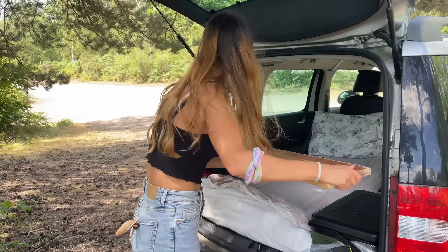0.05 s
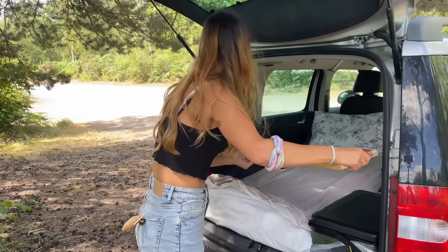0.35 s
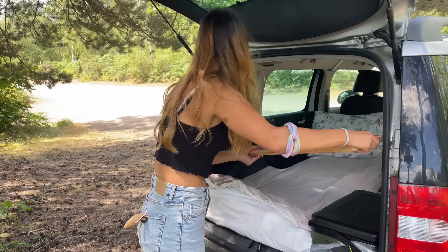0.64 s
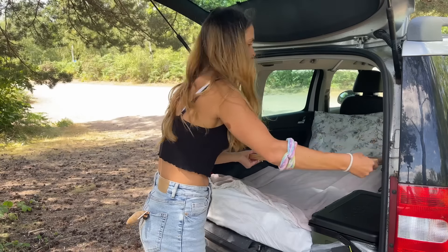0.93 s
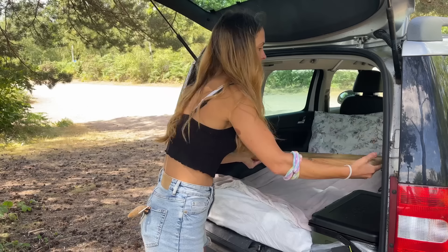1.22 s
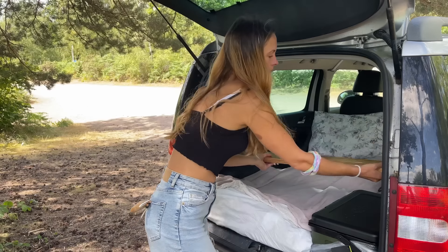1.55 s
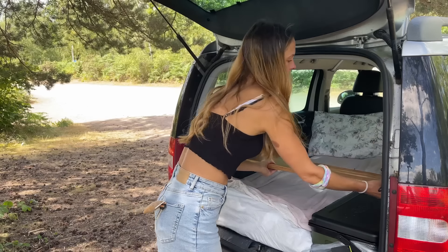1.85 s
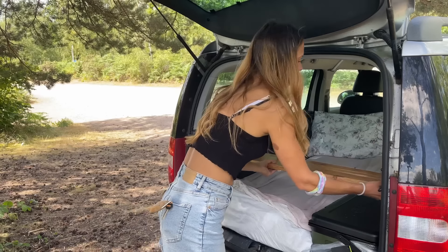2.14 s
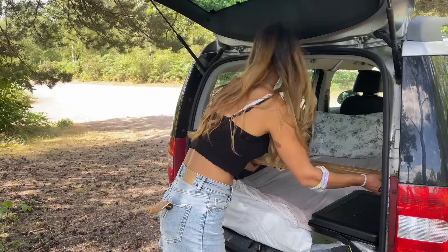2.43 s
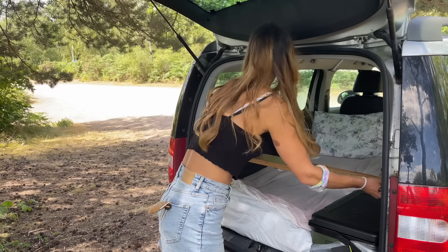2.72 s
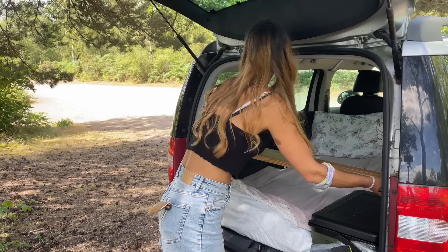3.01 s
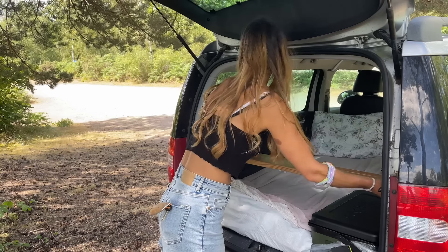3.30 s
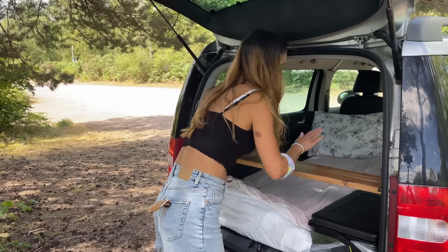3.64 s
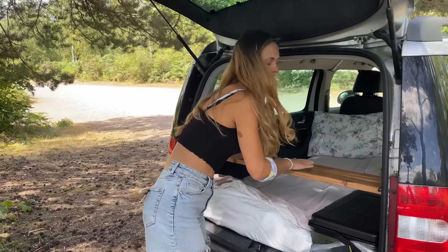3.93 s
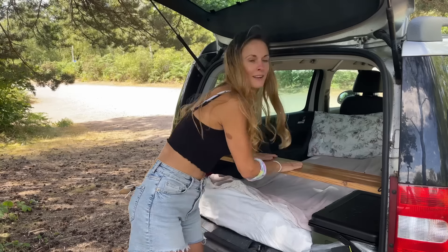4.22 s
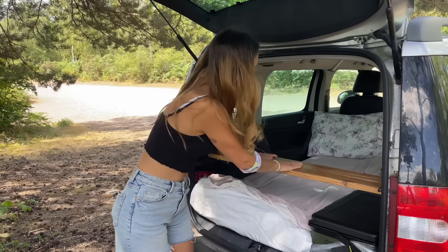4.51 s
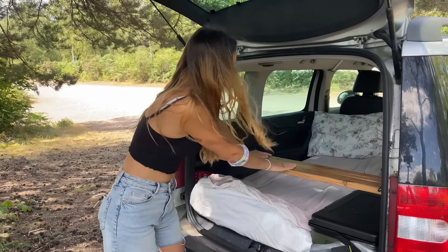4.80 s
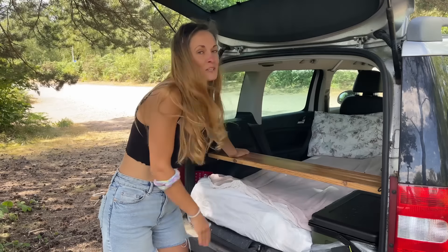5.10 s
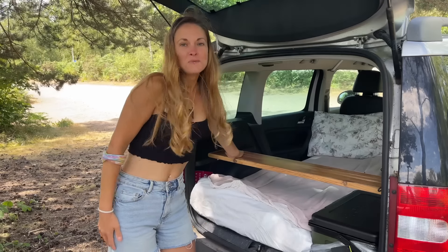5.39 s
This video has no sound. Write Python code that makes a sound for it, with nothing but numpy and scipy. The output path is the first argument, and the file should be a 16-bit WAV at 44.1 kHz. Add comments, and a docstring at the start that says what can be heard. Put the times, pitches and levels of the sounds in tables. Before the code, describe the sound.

Outdoors in a light breeze, wood bumps and rubs on car trim until a palm slap sends it juddering down with a hollow clatter.

```python
"""A wooden plank is shuffled into place across an open car boot: it knocks on plastic trim and door pillar,
and scrapes and squeals by stick-slip. Two palm slaps drive it home; it judders down the trim, panels boom.
Loose metal jingles, hands and clothes brush and tick.
Wind buffets the microphone over a quiet outdoor hush."""
import sys
import numpy as np
from scipy import signal
from scipy.fft import rfft, irfft
from scipy.io import wavfile

SR = 44100
rng = np.random.default_rng(int(sys.argv[2]) if len(sys.argv) > 2 else 0)


def file_out(sig):
    """Save sig as 16-bit WAV at sys.argv[1]."""
    # one column per channel
    cols = np.atleast_2d(sig).T
    # limit, then scale
    lim = np.clip(cols, -1, 1)
    pcm = np.round(lim * 32767).astype(np.int16)
    wavfile.write(sys.argv[1], SR, pcm)


N = 244887
T = np.arange(N) / SR
RING_T = T[:SR // 4]

# wind on the microphone: t/s, relative level/dB
GUSTS = [(0.0, -57.5), (1.92, -54.5), (2.09, -51.5), (2.12, -58.5), (3.32, -53), (3.34, -54.5),
         (4.2, -49.5), (4.28, -41), (4.37, -57.5), (4.74, -60.5), (4.79, -53.5), (5.55, -48)]
# spectra: f/Hz, relative level/dB
WIND_SPECTRUM = [(20, -28), (32, -11.5), (50, 0.5), (80, 0), (120, -6), (180, -13.5), (300, -22),
                 (800, -71)]
HUSH_SPECTRUM = [(60, -3), (160, -3.5), (300, 4.5), (600, 2), (950, -4.5), (1760, -10.5), (2500, -14.5),
                 (5000, -18), (9000, -16.5), (12000, -50), (13300, -72), (16000, -45)]
BRUSH_SPECTRUM = [(200, -45), (500, -0.5), (1300, 2), (3000, -0.5), (6400, -4), (8700, 2), (11400, 8.5),
                  (12600, -7.5), (13600, -44), (15500, -58)]
SNAP_SPECTRUM = [(30, -54), (300, 15), (900, 16), (2000, 9), (4000, 2), (6500, -7), (9000, -6.5),
                 (11500, 0.5), (13000, -21), (15500, -32)]
TRIM_SPECTRUM = [(60, -13), (300, 4.5), (700, 7.5), (1000, 2), (1500, 2), (2000, 0.5), (3000, -8.5),
                 (4200, -17.5), (6000, -24), (12000, -43)]
# modes: f/Hz, relative level/dB, t60/s
PLANK_MODES = [(185, -0.5, 0.18), (220, 7, 0.17), (250, 2.5, 0.14), (313.7, 1.5, 0.2), (380.2, 3.5, 0.14),
               (450.3, 4.5, 0.13), (580, -14, 0.16), (631.5, -4, 0.12), (770, -7.5, 0.15), (827, -4.5, 0.1),
               (920, -6, 0.11), (1082, -13.5, 0.14), (1193, -6.5, 0.068), (1634, -1, 0.07),
               (1894, -11, 0.075), (2647, -19, 0.053)]
PANEL_MODES = [(127.8, -3, 0.22), (156.6, 2.5, 0.15), (181.3, 2.5, 0.17), (201.2, 0, 0.12),
               (297, -10.5, 0.17), (453, -6.5, 0.11), (582.6, -15.5, 0.21), (644, -19, 0.2)]
METAL_MODES = [(4730, 1, 0.035), (4970, -1, 0.03), (5240, 0, .025)]
PILLAR_MODES = [(864, -0.5, 0.27), (902, 3, 0.11), (1073, -2, 0.15), (1820, -4, 0.088), (2723, -7, 0.061),
                (3140, -13.5, 0.041)]
CORNER_MODES = [(1055, 3, 0.018), (1480, -5, 0.015), (1770, -8, 0.0093), (2410, -5, 0.0089)]
# hand and cloth strokes: middle/s, length/s, level/dB, tilt/(dB/octave)
STROKES = [(0.738, 0.19, -65, -2.5), (1.401, 0.28, -65.5, -2.5), (1.528, 0.13, -56.5, 2),
           (1.681, 0.072, -53.5, -1.5), (1.985, 0.3, -65.5, 6), (2.146, 0.13, -65, 5),
           (2.229, 0.042, -57, 3), (2.377, 0.16, -62.5, 6), (2.535, 0.4, -67, 0.5), (2.95, 0.15, -58.5, -2),
           (3.756, 0.07, -64.5, 2), (4.324, 0.071, -51, -2), (4.418, 0.17, -60, 0.5),
           (4.891, 0.25, -53.5, 2.5), (5.227, 0.22, -61.5, -2)]
# bracelet and plank edge: t/s, level/dB, tilt/(dB/octave)
TICKS = [(0.332, -45.5, 4.5), (1.5187, -45.5, 7.5), (1.6543, -50, 10), (1.923, -51.5, 12), (2.144, -45, 17),
         (2.7318, -43, 2), (3.7314, -50.5, 9), (3.789, -48.5, 7.5), (4.428, -51.5, 4)]
# plank on trim, relative levels: t/s, plank/dB, contact resonance/Hz, trim/dB, panels/dB
KNOCKS = [(0.4934, -38.5, 1650, -45, -41), (0.4937, -28.5, 530, -49, -41.5), (.523, -36.5, 430, -47, -55),
          (.698, -39, 1500, -45.5, -36.5), (0.782, -45, 2300, -47.5, -43), (0.855, -34, 1900, -41.5, -32),
          (.860, -30, 257, -66, -38.5), (.895, -42.5, 595, -43, -35.5), (.934, -39, 326, -63, -41),
          (1.645, -49.5, 330, -60, -52), (1.841, -40.5, 620, -59, -58), (2.2408, -36, 2709, -29, -49),
          (2.2417, -27.5, 563, -41, -34), (2.278, -32, 395, -38, -35), (2.319, -49, 1490, -48, -37),
          (2.736, -40, 395, -51, -49), (2.957, -48.5, 2250, -46, -64), (3.232, -37, 1890, -33, -48),
          (3.235, -26, 252, -55, -38.5), (3.258, -32.5, 266, -41, -34), (3.8707, -33, 730, -30, -56),
          (3.871, -24, 260, -59, -35), (3.9056, -29, 2000, -24.5, -24), (3.9206, -24.5, 1490, -20.5, -22),
          (3.9458, -26.5, 2150, -23.5, -26), (3.953, -28.5, 1700, -21.5, -21),
          (4.019, -47.5, 200, -64, -37.5), (4.216, -33, 900, -32.5, -25), (4.246, -33.5, 1610, -35, -27.5),
          (5.401, -39, 289, -66, -39)]
# edge catching on trim: t/s, length/s, level/dB, f/Hz
SQUEALS = [(0.495, 0.006, -52, 1645), (0.694, 0.0069, -50.5, 1626), (0.733, 0.039, -54, 1623),
           (.781, 0.026, -54, 1620), (.782, 0.012, -54.5, 1885), (0.856, 0.016, -44.5, 1625),
           (0.888, 0.018, -51.5, 1614)]
# plank pushed along trim: middle/s, length/s, level/dB
PUSHES = [(0.751, 0.072, -46), (0.918, 0.11, -51.5), (1.056, 0.13, -53), (1.257, 1, -58),
          (1.893, 0.3, -56.5), (2.382, 0.44, -64.5), (2.739, 0.053, -51), (2.964, 0.59, -62),
          (4.117, 0.58, -69), (4.638, 0.28, -62)]
# loose metal shaken: t/s, relative level/dB
JINGLES = [(0.779, -59), (0.8798, -61), (0.928, -66), (0.9586, -65), (1.013, -62)]
# plank end on door pillar: t/s, level/dB
RAPS = [(0.855, -35.5), (2.2398, -28.5), (2.734, -48), (3.2316, -34)]
# hand on plank: t/s, fingers/dB, palm/dB
SLAPS = [(3.8631, -38, -32.5), (4.2111, -29.5, -45)]
# left microphone port over right: f/Hz, level/dB
PORT_BALANCE = [(300, 1.5), (750, 2.1), (2000, 2), (4500, 4), (8000, 2), (10500, 0)]
# left port ahead of right: f/Hz, phase/rad
PORT_LEAD = [(120, -0.15), (500, -0.5), (900, -0.5), (1640, 0), (2840, 0.57), (6720, 0.7), (7600, 1.5),
             (8870, -0.53), (11800, -6), (13000, -4.5)]


def undb(db):
    """Decibels to gain."""
    return 10 ** (np.asarray(db) / 20)


def unit(x):
    """Scale to rms 1."""
    return x / np.sqrt(np.mean(x ** 2))


def add(out, at_s, sound):
    """Mix a mono or stereo sound in."""
    start = int(at_s * SR)
    out[:, start:start + sound.shape[-1]] += sound[..., :N - start]


def noise(count, side_db):
    """Stereo white noise, side level relative to mid."""
    mid, side = rng.standard_normal((2, count))
    return np.array([mid + undb(side_db) * side, mid - undb(side_db) * side])


def drift(rate_hz, count=N):
    """Random drift, spread near 1."""
    knots = rng.standard_normal(2048)
    return np.interp(T[:count] * rate_hz, np.arange(len(knots)), knots)


def fade(t60_s, age_s=RING_T):
    """Exponential decay."""
    return np.exp(-np.log(1000) * age_s / t60_s)


def swell(from_middle_s, length_s, edge_db=-10.5, roundness=1.37):
    """Gain of a hand movement that speeds up and slows."""
    return undb(edge_db * np.minimum(np.abs(2 * from_middle_s / length_s) ** roundness, 20))


def lowpass(x, hz, order=2):
    """Butterworth low-pass."""
    return signal.sosfilt(signal.butter(order, hz, fs=SR, output="sos"), x)


def colour(x, spectrum, tilt_db_oct=0):
    """Minimum-phase filter; white noise keeps its level."""
    count = x.shape[-1]
    hz, db = np.transpose(spectrum)
    octave = np.log2(np.maximum(np.fft.rfftfreq(count, 1 / SR), hz[0]))
    gain = unit(undb(np.interp(octave, np.log2(hz), db) + tilt_db_oct * octave))
    cepstrum = irfft(np.log(gain), count)
    cepstrum[1:count // 2] *= 2  # fold onto positive time
    cepstrum[count // 2:] = 0
    return irfft(rfft(x) * np.exp(rfft(cepstrum)), count)


def ring(modes, lag_1khz_s, scatter_db, spread_rad, detune=0.005):
    """One blow on a set of modes; each contact point weights and detunes them."""
    out = np.zeros((2, len(RING_T)))
    for hz, db, t60_s in modes:
        size, pitch, start_rad, left, right = rng.standard_normal(5)
        lag_s = lag_1khz_s * (1000 / hz) ** 0.66  # low bending waves arrive and swell later
        age_s = np.maximum(RING_T - lag_s / 2, 0)
        onset = 1 - np.exp(-(age_s / lag_s) ** 2)
        phase = 2 * np.pi * hz * (1 + detune * pitch) * age_s + start_rad
        stereo_rad = spread_rad * np.array([[left], [right]])
        out += undb(db + scatter_db * size) * onset * fade(t60_s) * np.sin(phase + stereo_rad)
    return out / np.sqrt(sum(undb(db) ** 2 for _, db, _ in modes))


def wind(gain_db=3):
    """Eddies thump the microphone."""
    at_s, db = np.transpose(GUSTS)
    gusts = undb(gain_db + np.interp(T, at_s, db, right=-200))
    eddies = noise(N, side_db=-12) * undb(3 * drift(22))
    return colour(eddies, WIND_SPECTRUM) * gusts


def hush(level_db=-62):
    """Distant trees and roads: wide, near-steady noise."""
    return colour(noise(N, side_db=-0.5), HUSH_SPECTRUM) * undb(level_db + 0.5 * drift(2.45))


def brushing(rustle_db=-75):
    """Clothes rustle throughout; strokes over the wood catch and let go in a grainy hiss."""
    out = undb(rustle_db + 2 * drift(6.48)) * colour(noise(N, side_db=-37), BRUSH_SPECTRUM)
    for middle_s, length_s, db, tilt_db_oct in STROKES:
        grain = undb(2.5 * drift(350, SR) + 1.8 * drift(45, SR))
        hiss = colour(noise(SR, side_db=-16.5) * grain, BRUSH_SPECTRUM, tilt_db_oct)
        add(out, middle_s - 0.5, undb(db) * swell(T[:SR] - 0.5, length_s) * hiss)
    return out


def snap(db, tilt_db_oct, t60_s):
    """Short, bright noise burst."""
    burst = fade(t60_s) * noise(len(RING_T), side_db=-24)
    return undb(db) * colour(burst, SNAP_SPECTRUM, tilt_db_oct)


def ticks():
    """Light contacts of bracelet and plank edge."""
    out = np.zeros((2, N))
    for at_s, db, tilt_db_oct in TICKS:
        add(out, at_s, snap(db, tilt_db_oct, t60_s=0.024))
    return out


def contact(x, hz, q=1.31):
    """Springy contact: a resonant low-pass."""
    w = 2 * np.tan(np.pi * hz / SR)
    return signal.lfilter(*signal.bilinear([w * w], [1, w / q, w * w]), x)


def disperse(x, lag_s=0.005004, corner_hz=380):
    """Panel bending waves: lows below the corner arrive late."""
    hz = np.fft.rfftfreq(x.shape[-1], 1 / SR)
    lag_rad = 2 * np.pi * lag_s * corner_hz * np.arctan(hz / corner_hz)
    return irfft(rfft(x) * np.exp(-1j * lag_rad), x.shape[-1])


def clatter(low_t60_s=0.11, high_t60_s=0.049, split_hz=1100):
    """Dense, short-lived modes of plastic trim, with a faint cabin tail."""
    dense = unit(noise(len(RING_T), side_db=-10.5))
    low = lowpass(dense, split_hz, order=1)
    plastic = low * fade(low_t60_s) + (dense - low) * fade(high_t60_s)
    cabin = undb(-28) * dense * fade(t60_s=0.1)
    return disperse(colour(plastic + cabin, TRIM_SPECTRUM))


def knocks():
    """Each contact rings plank, trim and body panels; softer contacts lose treble."""
    out = np.zeros((2, N))
    for at_s, plank_db, contact_hz, trim_db, panel_db in KNOCKS:
        wood = undb(plank_db) * ring(PLANK_MODES, lag_1khz_s=0.0014, scatter_db=0.12, spread_rad=0.18)
        boom = undb(panel_db) * ring(PANEL_MODES, lag_1khz_s=0.0017, scatter_db=1, spread_rad=0.1)
        plastic = undb(trim_db) * lowpass(clatter(), 2 * contact_hz)
        add(out, at_s, 2 * (contact(wood, contact_hz) + boom) + plastic)
    return out


def squeals(attack_s=0.0041, t60_s=0.052, flutter_db=3.5):
    """The edge catches: slips lock into an unsteady tone that rings out on release."""
    out = np.zeros((2, N))
    for at_s, length_s, db, hz in SQUEALS:
        pitch_hz = hz * (1 + 0.03 * drift(400, len(RING_T)))
        gain = undb(db + flutter_db * drift(250, len(RING_T)))
        attack = 1 - np.exp(-RING_T / attack_s)
        release = fade(t60_s, np.maximum(RING_T - length_s, 0))
        tone = np.sin(2 * np.pi * np.cumsum(pitch_hz) / SR)
        add(out, at_s, gain * attack * release * tone)
    return out


def scrape(slips_per_s=600, slip_spread_db=3.5, rasp_db=-8):
    """Uneven stick-slip pulses shake the plank and rasp on the trim."""
    slips = (rng.random((1, N)) < slips_per_s / SR) * undb(slip_spread_db * rng.standard_normal(N))
    wood = ring(PLANK_MODES, lag_1khz_s=0.0017, scatter_db=8, spread_rad=0.17)
    dull_wood = lowpass(wood, hz=730, order=1)
    rub = unit(signal.fftconvolve(slips, dull_wood, axes=1)[:, :N])
    rasp = unit(signal.fftconvolve(slips, clatter(), axes=1)[:, :N])
    pushes = sum(undb(db) * swell(T - middle_s, length_s) for middle_s, length_s, db in PUSHES)
    return (rub + undb(rasp_db) * rasp) * pushes


def jingles(gain_db=6, bounce_s=0.009, loss_db=4.5):
    """Loose metal bounces three times, unevenly, per shake."""
    out = np.zeros((2, N))
    for at_s, db in JINGLES:
        for bounce in range(3):
            delay_s = bounce_s * bounce * (0.5 + rng.random())
            metal = ring(METAL_MODES, lag_1khz_s=0.0033, scatter_db=5, spread_rad=0.6)
            add(out, at_s + delay_s, undb(db + gain_db - loss_db * bounce) * metal)
    return out


def raps():
    """The plank's end rings the hard door pillar."""
    out = np.zeros((2, N))
    for at_s, db in RAPS:
        add(out, at_s, undb(db) * ring(PILLAR_MODES, lag_1khz_s=0.0016, scatter_db=0.6, spread_rad=0.33))
    return out


def click(at_s=1.6936, level_db=-34):
    """A trim corner springs back as the plank slips past; its modes start together."""
    out = np.zeros((2, N))
    for hz, db, t60_s in CORNER_MODES:
        add(out, at_s, undb(level_db + db) * fade(t60_s) * np.sin(2 * np.pi * hz * RING_T))
    return out


def slaps(palm_lag_s=0.0074, tilt_db_oct=1.75, t60_s=0.069):
    """A hand hits the plank: fingers, then palm."""
    out = np.zeros((2, N))
    for at_s, fingers_db, palm_db in SLAPS:
        add(out, at_s, snap(fingers_db, tilt_db_oct, t60_s))
        add(out, at_s + palm_lag_s, snap(palm_db, tilt_db_oct, t60_s))
    return out


def scene():
    """Plank, loose metal, hands and open air."""
    plank = knocks() + raps() + scrape() + squeals() + click()
    return plank + jingles() + ticks() + slaps() + brushing() + wind() + hush()


def record(dry, cutoff_hz=15700):
    """Two microphone ports: left a little louder, treble out of phase, steep top cut."""
    hz = np.fft.rfftfreq(N, 1 / SR)
    side = np.array([[0.5], [-0.5]])
    balance = undb(side * np.interp(hz, *np.transpose(PORT_BALANCE)))
    phase = np.exp(1j * side * np.interp(hz, *np.transpose(PORT_LEAD)))
    ports = irfft(rfft(dry) * balance * phase, N)
    return signal.sosfilt(signal.ellip(8, 0.2, 70, cutoff_hz, fs=SR, output="sos"), ports)


dry = scene()
out = record(dry)
file_out(out)
```